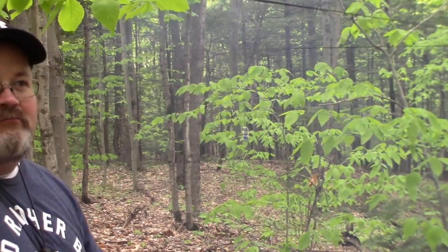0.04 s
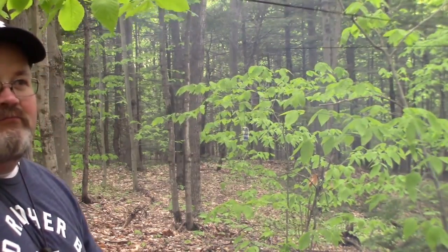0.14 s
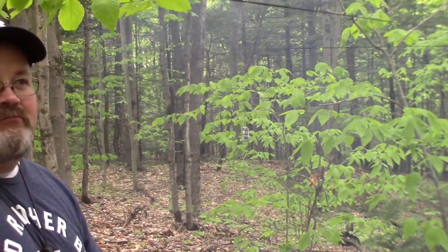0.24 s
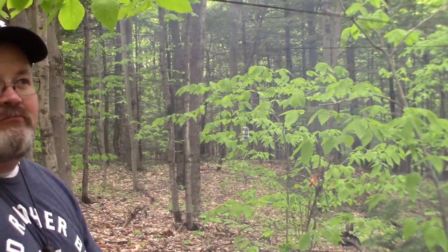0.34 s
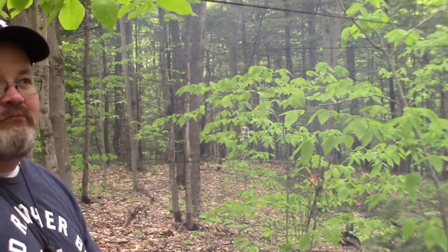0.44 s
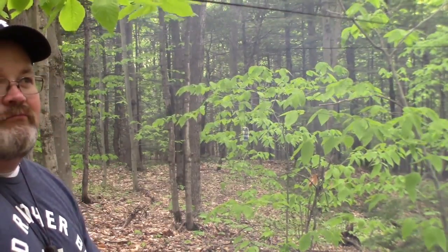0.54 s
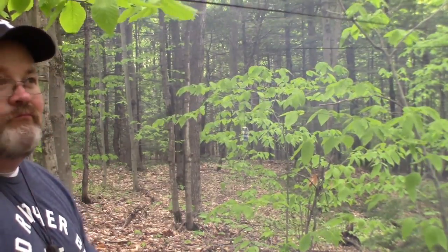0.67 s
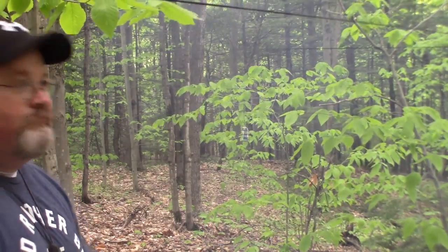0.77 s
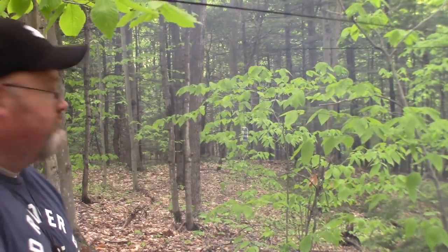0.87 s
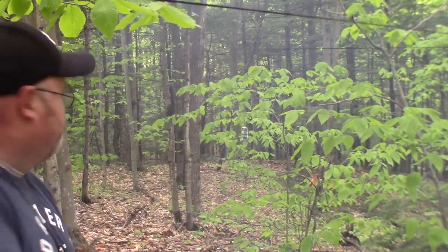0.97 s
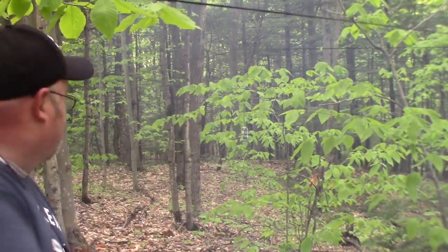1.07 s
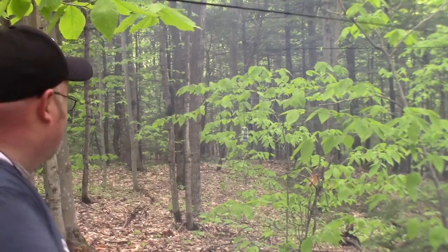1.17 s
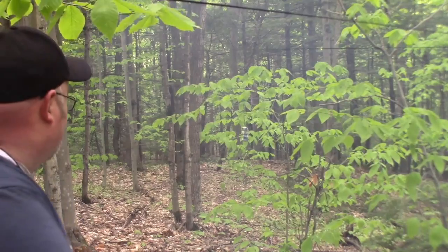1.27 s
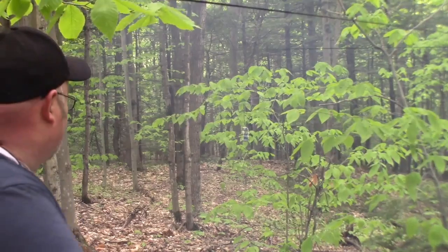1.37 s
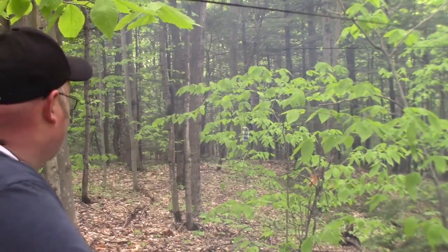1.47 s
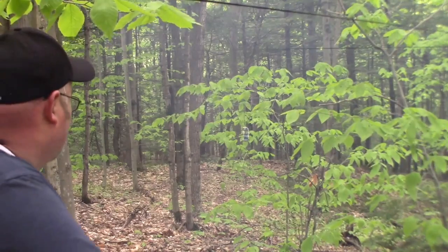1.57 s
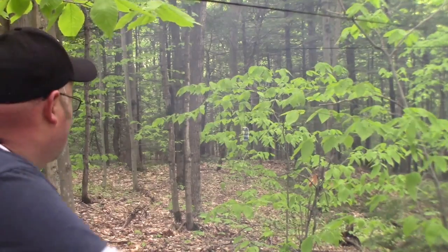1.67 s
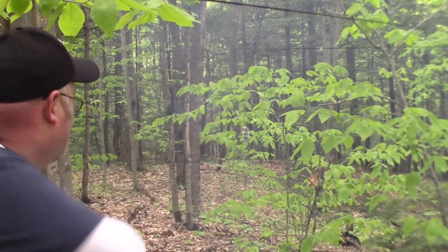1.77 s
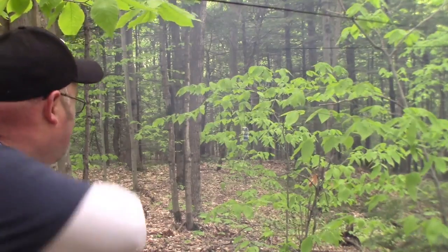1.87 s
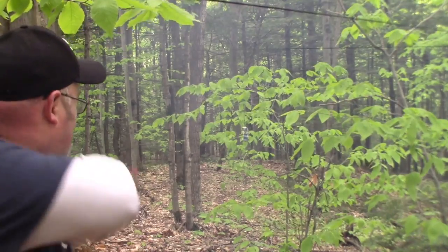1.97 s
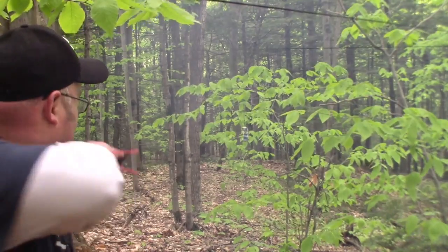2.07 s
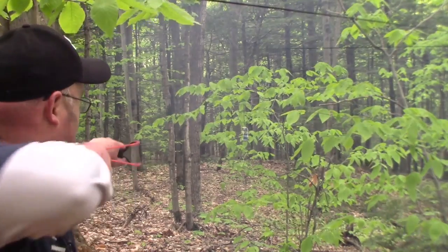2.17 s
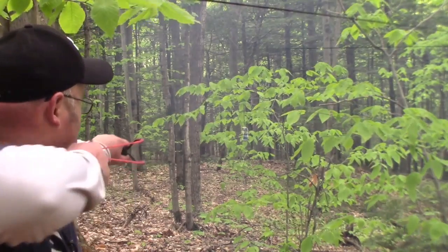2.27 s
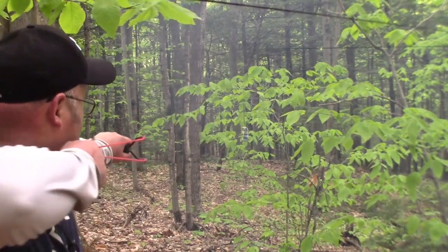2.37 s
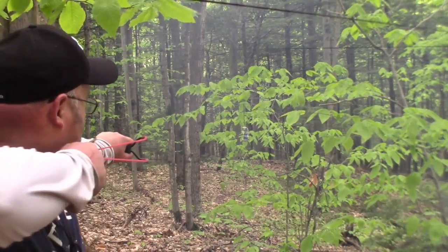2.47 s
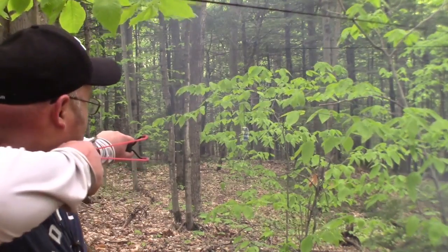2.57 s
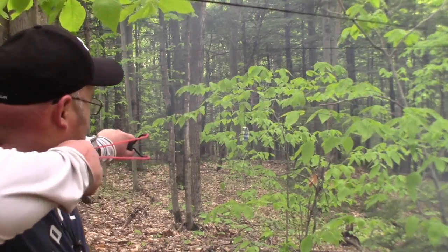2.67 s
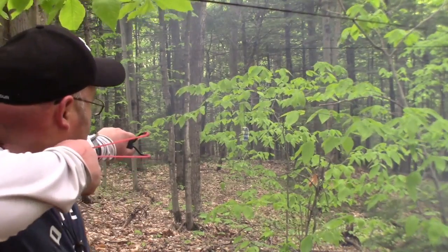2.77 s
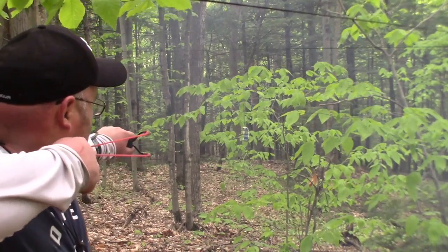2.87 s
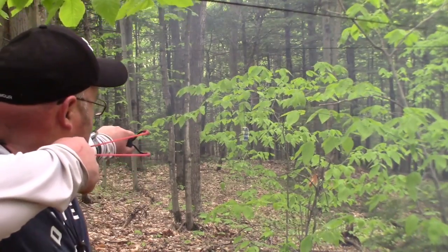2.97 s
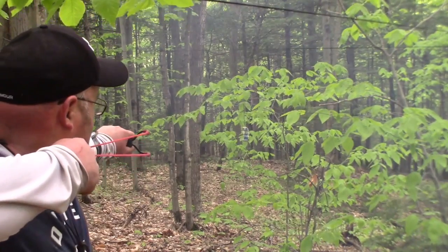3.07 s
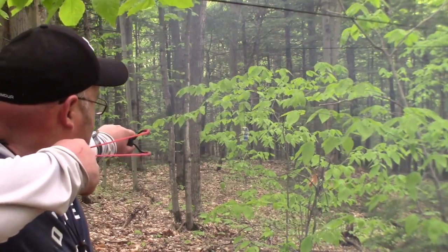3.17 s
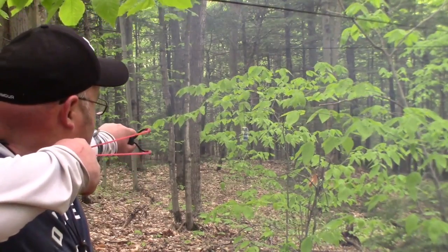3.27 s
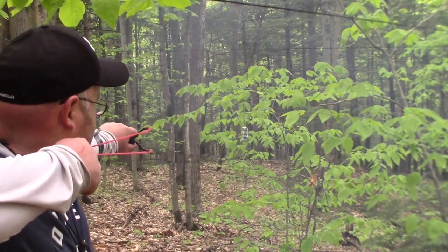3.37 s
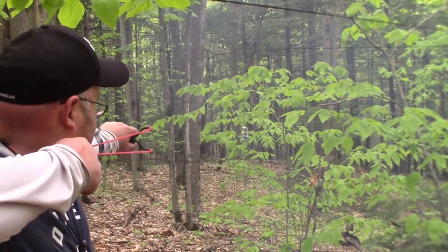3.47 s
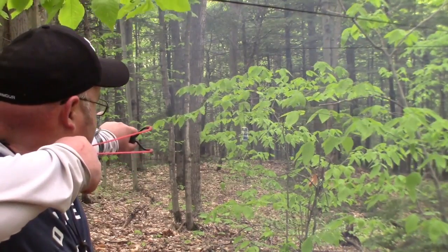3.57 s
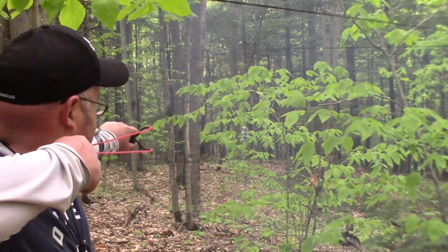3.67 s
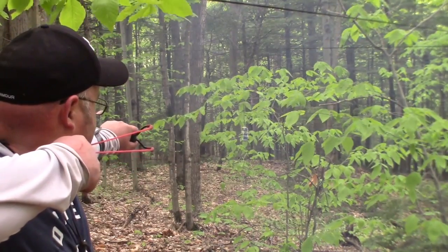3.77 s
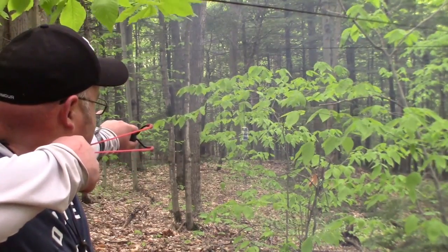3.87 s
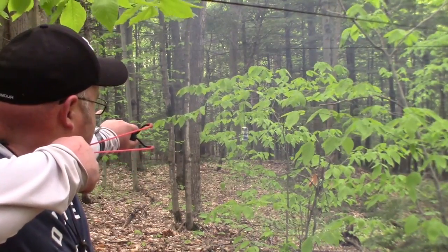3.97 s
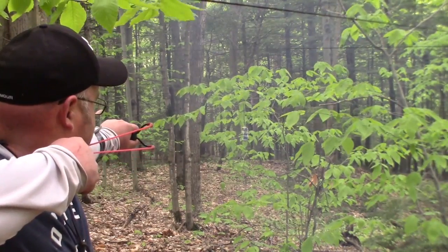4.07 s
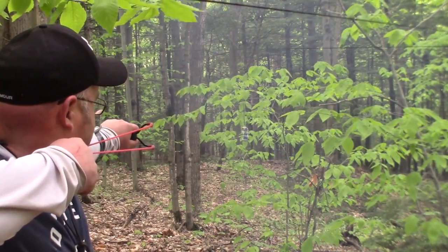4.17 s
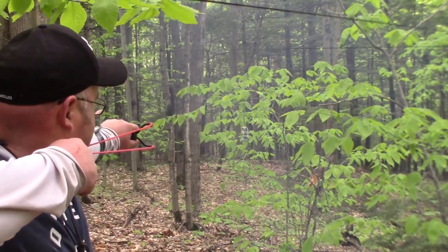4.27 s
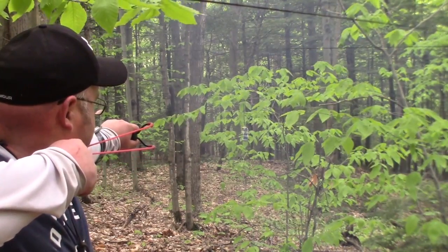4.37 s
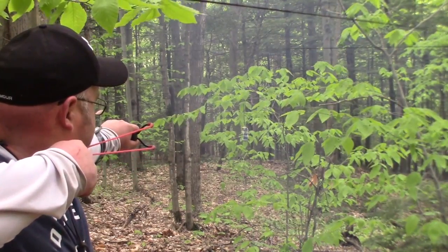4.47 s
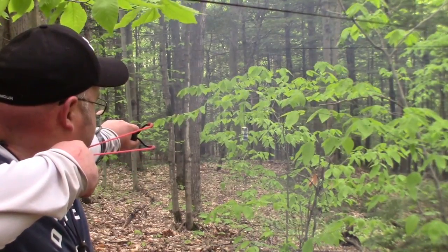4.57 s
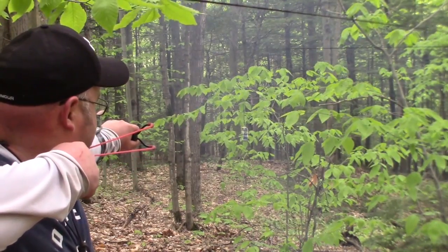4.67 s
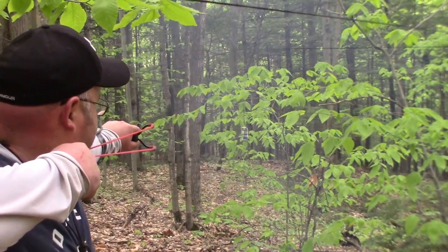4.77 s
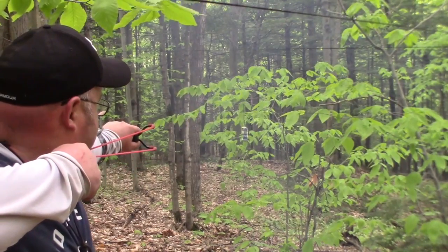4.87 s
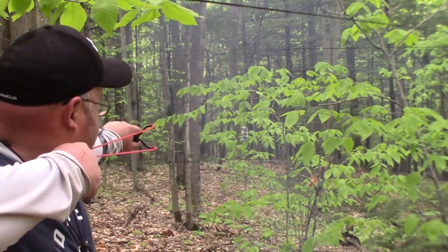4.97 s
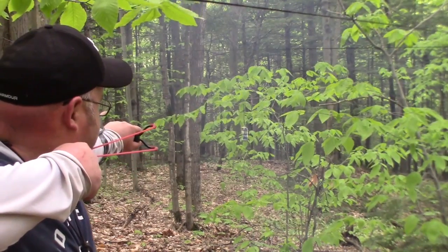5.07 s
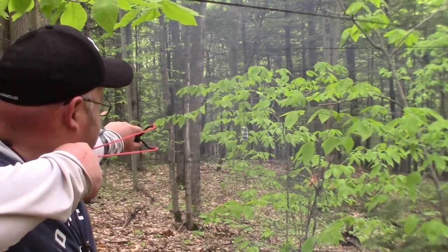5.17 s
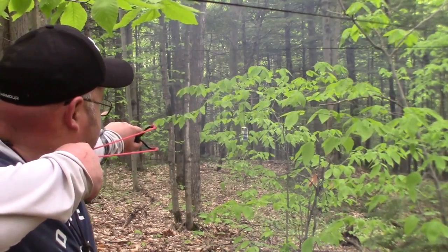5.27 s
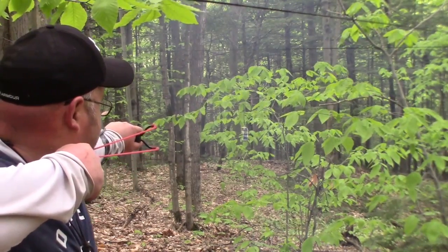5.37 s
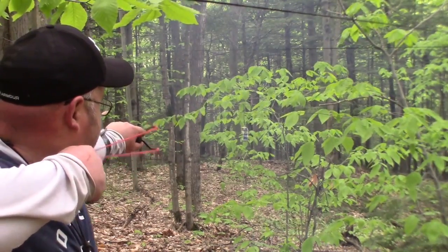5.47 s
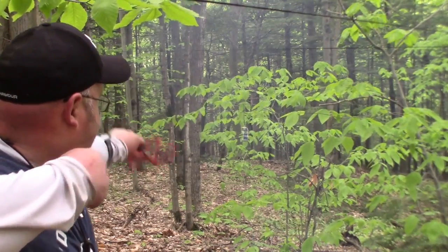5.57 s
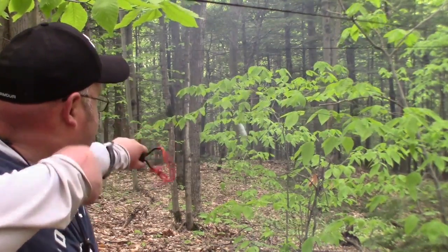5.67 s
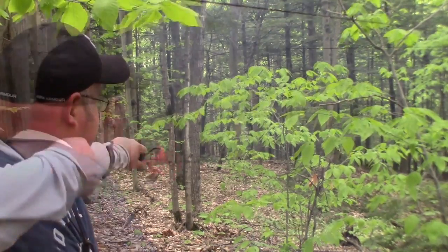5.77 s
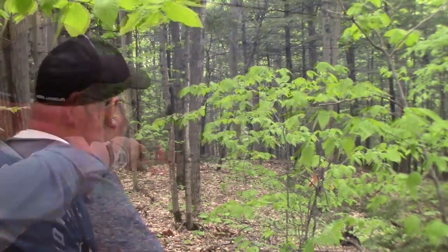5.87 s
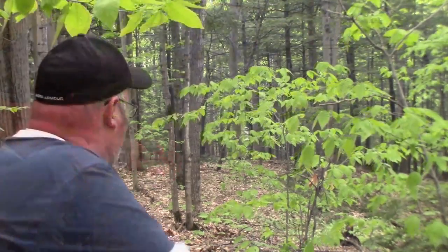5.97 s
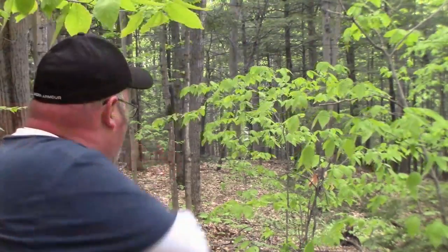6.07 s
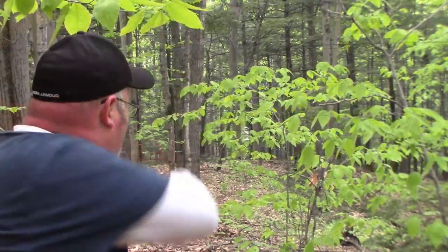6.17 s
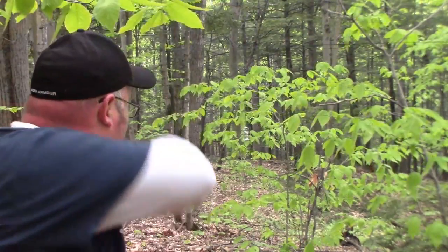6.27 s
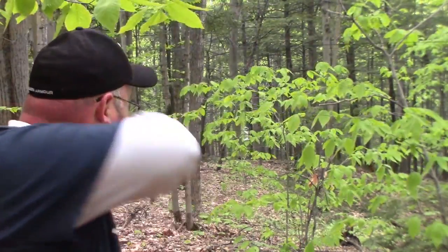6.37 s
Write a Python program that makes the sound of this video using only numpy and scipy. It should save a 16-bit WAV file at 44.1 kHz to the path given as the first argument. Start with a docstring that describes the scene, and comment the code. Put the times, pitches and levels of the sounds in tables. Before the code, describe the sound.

In quiet woods, birds chirp, whistle and give a few hoarse calls over a faint distant hum and leaf hiss. Close to the microphone a sleeve rustles and a slingshot is loaded with small clicks, then drawn with faint ticks. After a pause the rubber tubes snap loudly against the fork, and the shot at once cracks on a target, echoing briefly among the trees. Air then softly buffets the microphone.

```python
"""Leafy woods: over a distant hum and leaf hiss, birds call hoarsely, chirp and whistle among the trees.
Beside a camera a slingshot is loaded with clicks and sleeve rustle, then drawn, its tubes slipping on the fork.
At 5.6 s the tubes snap forward and slap the fork; the shot cracks against a target; trunks scatter both back.
The camera's gain control ducks under the blows and slowly recovers; air then buffets the microphone."""
import sys
import numpy as np
from scipy import signal
from scipy.fft import rfft, irfft, next_fast_len
from scipy.io import wavfile
from scipy.ndimage import map_coordinates

SR = 44100
rng = np.random.default_rng(int(sys.argv[2]) if len(sys.argv) > 2 else 0)


def generate_wav(signal):
    """Clip the signal to [-1, 1] and save it as 16-bit WAV at the path in sys.argv[1]."""
    frames = np.transpose(np.atleast_2d(signal))
    scaled = np.clip(frames, -1, 1) * 32767
    pcm = np.round(scaled).astype(np.int16)
    wavfile.write(sys.argv[1], SR, pcm)


N = 283518


def amp(db):
    """Decibels to gain."""
    return 10 ** (np.asarray(db) / 20)


def unit(x):
    """Scale to rms 1."""
    return x / np.sqrt(np.mean(x ** 2) + 1e-20)


def along(points, hz):
    """Read a curve of (f/Hz, value) points on a log frequency axis."""
    f, v = np.transpose(points)
    return np.interp(np.log(hz + 1), np.log(f + 1), v)


def wobble(rate, size=N):
    """Smooth random modulation, rate knots a second."""
    return map_coordinates(rng.standard_normal(int(size * rate / SR) + 4), [np.arange(size) * rate / SR])


def envelope(s, attack, hold, t60):
    """Gain that swells from time s, holds and dies away."""
    t = np.arange(N) / SR - s
    return np.clip(t / attack, 0, 1) ** 2 * amp(-60 * np.clip((t - attack - hold) / t60, 0, 2))


def filtered(x, response):
    """EQ x with a complex response of frequency."""
    size = x.shape[-1]
    m = next_fast_len(size + SR // 8)
    return irfft(rfft(x, m) * response(np.fft.rfftfreq(m, 1 / SR)), m)[..., :size]


def resonance(f, hz, width):
    """A causal resonance of peak gain 1."""
    return 1j * f * width / (hz * hz - f * f + 1j * f * width)


def noise(spectrum, size=N, body=lambda f: 1):
    """Noise of rms 1 with the given spectrum, through an optional body."""
    return unit(filtered(rng.standard_normal(size), lambda f: amp(along(spectrum, f)) * body(f)))


def spread(mid, side, side_db):
    """Mid/side to stereo: two closely spaced ports hear nearly the same sound."""
    return np.array([mid + amp(side_db) * side, mid - amp(side_db) * side])


def add(track, s, sound):
    """Mix a sound in at time s."""
    part = track[..., max(0, round(s * SR)):][..., :sound.shape[-1]]
    part += sound[..., :part.shape[-1]]


def trunks(stretch, hold, side_db=-16):
    """Stereo reverb tail: nearby trunks keep it level for a moment, then the treble dies before the mids."""
    # decay of the woods, scaled by stretch: f/Hz, t60/s
    decay = [(100, 0.27), (500, 0.49), (2500, 0.51), (5000, 0.48), (8000, 0.33), (14000, 0.31)]
    hz, t, bands = signal.stft(rng.standard_normal((2, SR)), SR, nperseg=256)
    fade = amp(-60 * np.maximum(t - hold, 0) / (stretch * along(decay, hz)[:, None]))
    onset = 1 - np.exp(-t / 0.0022)
    tail = signal.istft(bands * fade * onset, SR, nperseg=256)[1]
    return spread(*tail, side_db) / np.linalg.norm(tail[0])


def echo(x, stretch, hold, side_db=-13):
    """The reverb return of the woods for x."""
    return signal.fftconvolve(x[None], trunks(stretch, hold, side_db), axes=1)[:, :N]


def air():
    """A bed of distant hum and leaf hiss; puffs hit the microphone, and a soft rush joins the last ones."""
    # tone of the hum and leaves: f/Hz, level/dB
    bed_eq = [(12, -23.5), (20, -1.5), (74, -2.5), (109, -3.5), (185, -5.5), (266, -2.5), (404, -5.5),
              (464, -6), (833, -10), (1540, -22), (3000, -26.5), (3540, -27), (4950, -26.5), (6910, -31),
              (15500, -34.5)]
    # fader ride of the leaf hiss: t/s, level/dB
    leaf_ride = [(0, -59.5), (2, -59), (3.8, -62.5), (5.5, -61)]
    # puffs of air: t/s, level/dB, hold/s
    puff_cues = [(0, -46.5, 0.024), (.8, -51, 0.023), (2.732, -44, 0.025), (5.971, -44, 0.41),
                 (6.105, -36, 0.0209), (6.216, -45.5, .04)]
    # rumble of a puff: f/Hz, level/dB
    puff_eq = [(10, -14), (28, 5), (65, -5.5), (110, -15), (250, -35.5), (1000, -80)]
    # tone of the rush: f/Hz, level/dB
    rush_eq = [(350, -33.5), (600, -10), (890, 1.5), (979, -4), (1660, -4.5), (2440, -9), (5150, -11.5),
               (15500, -30)]
    low = lambda f: 1 / np.sqrt(1 + (f / 1800) ** 4)  # crossover from hum to hiss
    high = lambda f: np.sqrt(1 - low(f) ** 2)
    hum_db = -49.5 + 0.33 * wobble(4.71)
    hiss_db = np.interp(np.arange(N) / SR, *np.transpose(leaf_ride))
    hum = amp(hum_db) * spread(noise(bed_eq, body=low), noise(bed_eq, body=low), side_db=-13)
    hiss = amp(hiss_db) * spread(noise(bed_eq, body=high), noise(bed_eq, body=high), side_db=-3.5)
    draught = sum(amp(db) * envelope(s, attack=0.021, hold=hold, t60=.18) for s, db, hold in puff_cues)
    puffs = draught * spread(noise(puff_eq), noise(puff_eq), side_db=-19)
    swell = amp(-51) * envelope(6.0, attack=0.21, hold=0.054, t60=2.5)
    rush = swell * spread(noise(rush_eq), noise(rush_eq), side_db=-12)
    return hum + hiss + puffs + rush


def note(rows, waver, hoarse=0., buzz_hz=120):
    """A bird's tone glides through (t/s, f/Hz, level/dB); fast uneven pitch flutter makes it hoarse."""
    s, hz, db = np.transpose(rows)
    t = np.arange(s[0], s[-1], 1 / SR)
    flutter = np.sin(2 * np.pi * np.cumsum(buzz_hz * (1 + .2 * wobble(60, len(t)))) / SR)
    pitch = np.interp(t, s, hz) * (1 + hoarse * flutter + waver * wobble(150, len(t)))
    gain = np.sqrt(2) * amp(np.interp(t, s, db)) * signal.windows.tukey(len(t), .06)
    return gain * np.sin(2 * np.pi * np.cumsum(pitch) / SR)


def hoarse_calls():
    """Each call climbs ever faster and swells, then sags and fades; its octave peaks about halfway up."""
    # calls: t/s, rise/s, start f/Hz, top f/Hz, relative level/dB, octave against that level/dB
    cues = [(0, 0.011, 3000, 3080, -54.5, -40), (.84, 0.13, 2230, 2930, -40.5, -26),
            (2.42, 0.0975, 2696, 2850, -65.5, -40), (3.589, 0.1, 3620, 4140, -61, -40),
            (4.86, .31, 1937, 3022, -44.5, -12)]
    sag_s, sag_hz, fade_db, db_per_octave = 0.15, 228, 8, 23.5
    track = np.zeros(N)
    for s, rise, start_hz, top_hz, db, octave_db in cues:
        t = np.linspace(0, rise + sag_s, num=40)
        climb, sag = np.minimum(t / rise, 1), np.maximum(t - rise, 0) / sag_s
        hz = start_hz + (top_hz - start_hz) * climb ** 1.2 - sag_hz * sag
        level = db + db_per_octave * np.log2(hz / top_hz) - fade_db * sag ** 2
        octave_level = db + octave_db - 110 * (climb - .45) ** 2 - 18 * sag
        fundamental = note(np.transpose([t, hz, level]), waver=.021, hoarse=0.088, buzz_hz=290)
        octave = note(np.transpose([t, 2 * hz, octave_level]), waver=0.0059, hoarse=.025, buzz_hz=292)
        add(track, s, fundamental + octave)
    return track


def clear_whistles():
    """Pure gliding bird tones: one long whistle between two short falling ones."""
    # a high note, a dip and a slow rise: t/s, f/Hz, relative level/dB
    long_glide = [(3.605, 3700, -66), (3.625, 4160, -53), (3.65, 4400, -51.5), (3.69, 4420, -54),
                  (3.73, 4390, -66), (3.85, 4340, -64), (3.93, 3700, -69), (4, 3463, -58),
                  (4.15, 3415, -64), (4.64, 4060, -57.5), (4.78, 4020, -73)]
    # falling whistles: t/s, length/s, start f/Hz, end f/Hz, relative level/dB
    downslurs = [(.16, .22, 3870, 3720, -61), (5.228, .13, 4120, 3850, -61)]
    track = np.zeros(N)
    add(track, long_glide[0][0], note(long_glide, waver=.007))
    for s, length, start_hz, end_hz, db in downslurs:
        add(track, s, note([(0, start_hz, db), (length, end_hz, db - 2.5)], waver=.012))
    return track


def song():
    """A bird chirps seven three-note phrases, swelling to full voice as the tempo drags a little."""
    # the three notes, timed from the flick: t/s, f/Hz, relative level/dB
    lisp = [(-.09, 5020, -8), (-.05, 5280, -11), (.005, 5310, -8.5)]
    flick = [(0, 4725, -2), (.016, 4000, 0.5), (.03, 3380, 1.5), (.043, 3070, -1)]
    slur = [(.06, 4457, 0), (.077, 4080, -4.5), (.094, 3840, -3), (.112, 3860, -1), (.125, 4400, -10)]
    start_s, period_s, drag_s = .42, .267, .0007
    track = np.zeros(N)
    for k in range(7):
        s = start_s + period_s * k + drag_s * k ** 2
        db = -53 - 7.5 * np.exp(-k / 1.9)
        for rows, waver in [(lisp, .028), (flick, .018), (slur, .026)]:
            add(track, s + rows[0][0], amp(db) * note(rows, waver))
    return track


def birds():
    """The bird mix is wet: most of their sound arrives by way of the trees."""
    calls, whistles, chirps = hoarse_calls(), clear_whistles(), song()
    direct = amp(-10.5) * calls + amp(-16) * whistles + amp(-5) * chirps
    # foliage along the path blurs each note over a few hundredths of a second
    blur = amp(-5.5) * echo(calls + whistles + chirps, stretch=0.06, hold=0.0075, side_db=-8)
    call_echo = amp(-3.5) * echo(calls, stretch=2.32, hold=0.018, side_db=-9)
    whistle_echo = amp(-6.5) * echo(whistles, stretch=2.4, hold=0.041, side_db=-13.5)
    chirp_echo = amp(-2.5) * echo(chirps, stretch=2.6, hold=0.049, side_db=-27)
    return direct + blur + call_echo + whistle_echo + chirp_echo


def sleeve():
    """A sleeve rustles in tiny uneven grains while the pouch is loaded."""
    # strokes of the sleeve: t/s, level/dB, attack/s, t60/s
    strokes = [(0, -59.5, 0.003, 0.31), (.168, -47, 0.019, 0.33), (.318, -54.5, 0.013, 0.11),
               (.375, -55.5, 0.038, 0.41), (.55, -54, 0.18, 0.86), (1.053, -55.5, 0.0046, .06),
               (1.08, -58, .2, .6), (1.334, -57.5, 0.0052, .2)]
    # tone of the cloth: f/Hz, level/dB
    cloth_eq = [(300, -27), (1800, -1.5), (3000, -6), (4500, 3), (6000, 3.5), (8000, -3), (11000, -2.5),
                (15500, -19)]
    motion = sum(amp(db) * envelope(s, attack, hold=0.013, t60=t60) for s, db, attack, t60 in strokes)
    grain = amp(2.2 * wobble(500))
    return motion * grain * spread(noise(cloth_eq), noise(cloth_eq), side_db=-20)


def ticks(cues, snap_db, t60):
    """Tiny blows, each a dry snap plus the ring of the fork."""
    # modes of the fork: f/Hz, width/Hz, level/dB
    modes = [(3000, 430, -5.5), (5100, 420, 2), (7970, 330, -3), (11000, 900, -16)]
    # dry snap of the pouch: f/Hz, level/dB
    snap_eq = [(1000, -36), (4000, -8), (5600, 0), (10500, -5), (15500, -16)]
    track, t = np.zeros(N), np.arange(SR // 15) / SR
    fork = lambda f: sum((-1) ** k * amp(db) * resonance(f, hz, width)
                         for k, (hz, width, db) in enumerate(modes))
    tone = lambda f: fork(f) + amp(snap_db + along(snap_eq, f))
    for s, db in cues:
        tick = filtered(rng.standard_normal(len(t)), tone) * amp(-60 * t / t60)
        add(track, s, amp(db) * tick / np.abs(tick).max())
    return track


def load_and_draw():
    """Shot and pouch click in the fingers; the stretching tubes slip on the fork and ring it."""
    # dry clicks: t/s, peak level/dB
    clicks = [(.1858, -41), (.1975, -32), (.473, -43), (.4983, -44), (.623, -41), (1.0614, -25.5),
              (1.3388, -26.5), (1.6062, -38), (1.8026, -39), (3.5533, -41.5), (3.7262, -40)]
    # ringing slips: t/s, peak level/dB
    slips = [(2.152, -42), (2.338, -44), (2.4384, -42), (2.6085, -39), (2.8694, -36.5), (2.9911, -40),
             (3.238, -40), (3.3004, -40), (4.6084, -44), (4.6803, -45)]
    taps = ticks(clicks, snap_db=11, t60=0.0067) + ticks(slips, snap_db=-24, t60=0.013)
    return taps + amp(-10) * echo(taps, stretch=.5, hold=0.013)


def release(let_go_s=5.619):
    """The tubes whip forward with a swish and a thump of air, slap the fork and flap back against it."""
    # tubes and pouch hitting the fork: t/s, level/dB, t60/s, ring f/Hz, ring level/dB
    hits = [(5.6239, -28, 0.011, 9000, 4), (5.627, -12, 0.0046, 1110, 7), (5.6437, -12.5, 0.0077, 1206, -1),
            (5.6463, 8.5, 0.009, 3900, 11.5), (5.6494, 4, 0.011, 5170, 8), (5.6575, 1.5, 0.015, 5400, -1.5),
            (5.6794, 4.5, 0.0022, 9980, 20), (5.696, 0.5, 0.011, 1200, 0.5)]
    # tone of the rubber: f/Hz, level/dB
    rubber_eq = [(60, -18.5), (150, -5), (500, -8.5), (1100, 2), (2400, -7.5), (5000, 0.5), (9000, -7),
                 (13000, -16), (16000, -27)]
    # low thump of air: f/Hz, level/dB
    thump_eq = [(25, -21.5), (70, -4.5), (130, -2), (300, -8), (700, -19.5), (3000, -75.5)]
    slaps, t = np.zeros(N), np.arange(SR // 10) / SR
    for s, db, t60, hz, ring_db in hits:
        fade = amp(-60 * t / t60)
        slap = fade * noise(rubber_eq, len(t), lambda f: 1 + amp(ring_db) * resonance(f, hz, 0.26 * hz))
        add(slaps, s, amp(db) * slap * np.linalg.norm(fade) / np.linalg.norm(slap))
    flicker = amp(-14.5 + 2 * wobble(400))
    swish = flicker * envelope(let_go_s, attack=0.038, hold=.025, t60=.125) * noise(rubber_eq)
    thump = amp(-31) * envelope(let_go_s, attack=0.016, hold=.055, t60=.11) * noise(thump_eq)
    tubes = slaps + swish + thump
    return tubes + amp(-12.5) * echo(tubes, stretch=0.55, hold=.012)


def strike(s=5.7766):
    """The shot cracks the target, whose modes ring briefly; far among the trunks, its echo is strong."""
    # modes of the target: f/Hz, width/Hz, level/dB
    modes = [(980, 97, -9), (2190, 62, 1), (3426, 79, 6.5), (5400, 160, -0.5), (7800, 81, 2.5),
             (9100, 95, -8), (9860, 149, -5), (11740, 98, -11.5), (11700, 140, -17), (13500, 200, -8)]
    # tone of the crack: f/Hz, level/dB
    crack_eq = [(71, -48), (120, -37.5), (346, 0.5), (733, -15.5), (1040, 1.5), (1790, -5.5), (2240, 3),
                (2480, -11.5), (3370, -6), (5060, 0.5), (5380, 0), (12900, -7.5), (15500, -24)]
    # the crack as the trunks return it: f/Hz, level/dB
    scatter_eq = [(71, -51), (120, -21), (216, -34), (300, -14), (398, -7.5), (469, -2.5), (812, -7.5),
                  (880, 2.5), (1080, -7.5), (1430, -2.5), (2920, -8), (5060, -2), (9900, -9), (15500, -24)]
    t = np.arange(SR // 4) / SR
    ring = np.zeros(len(t))
    for hz, width, db in modes:
        fade = amp(db) * np.sqrt(width) * np.exp(-np.pi * width * t)
        ring += fade * np.sin(2 * np.pi * hz * t) * rng.choice([-1, 1])
    crack = noise(crack_eq, len(t)) * (amp(-0.5 - 60 * t / 0.037) + amp(-7.5 - 60 * t / 0.072))
    impact = crack + amp(5) * ring / np.abs(ring).max()
    track = np.zeros((2, N))
    add(track, s, impact * amp([[.6], [-.6]]))  # panned a touch left
    scatter = filtered(trunks(stretch=0.94, hold=0.045), lambda f: amp(along(scatter_eq, f)))
    delay = np.arange(scatter.shape[1]) / SR
    near = amp(5 / (1 + (delay / 0.058) ** 6))  # the closest trunks answer loudest
    add(track, s + .002, amp(-15) * near * scatter / scatter[:, :SR // 25].std())
    return track


def scene():
    """The mix at the microphone, whose right side is a little more sensitive in the treble."""
    # stereo balance: f/Hz, left minus right level/dB
    balance = [(60, 0), (110, 2.5), (200, 1.0), (380, -1), (700, -2.0), (1290, -3), (2380, -2),
               (4400, -2.5), (8120, -3.0), (15000, -0.5)]
    mix = release() + strike() + load_and_draw() + sleeve() + birds() + air()
    return filtered(mix, lambda f: amp(np.outer([.5, -.5], along(balance, f))))


def record(dry, threshold_db=-9.0, recovery_db_per_s=19, ceiling=.9, top_hz=15450):
    """Gain control ducks within 2 ms and recovers slowly; peaks round off; the band ends steeply."""
    window = SR // 500
    power = signal.lfilter(np.ones(window) / window, 1, np.mean(dry ** 2, axis=0))
    over_db = np.maximum(10 * np.log10(power + 1e-12) - threshold_db, 0)
    ramp = recovery_db_per_s * np.arange(N) / SR
    duck_db = np.maximum.accumulate(over_db + ramp) - ramp
    ducked = dry * amp(-duck_db)
    rounded = ducked / (1 + (ducked / ceiling) ** 6) ** (1 / 6)
    return filtered(rounded, lambda f: 1 / np.sqrt(1 + (f / top_hz) ** 200))


dry = scene()
out = record(dry)
generate_wav(out)
```